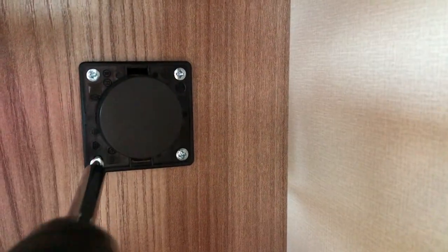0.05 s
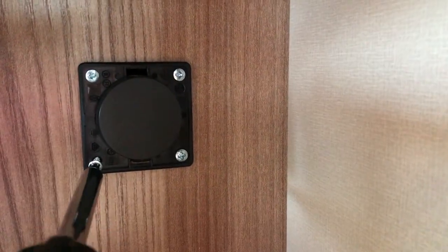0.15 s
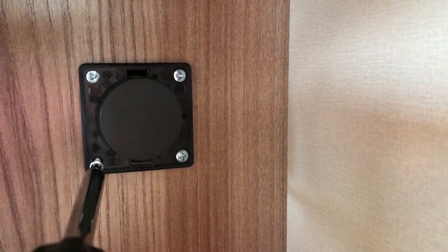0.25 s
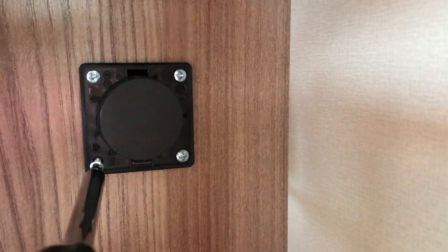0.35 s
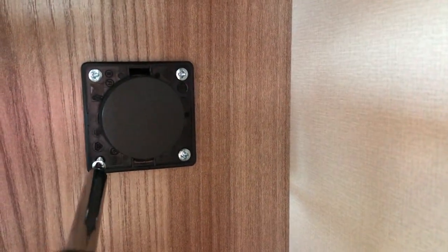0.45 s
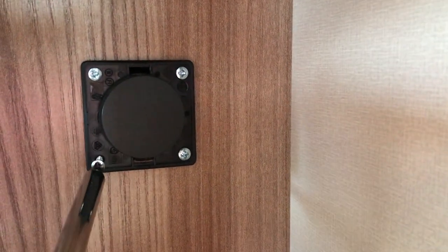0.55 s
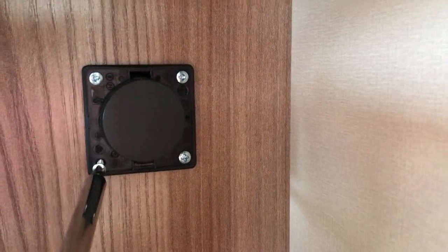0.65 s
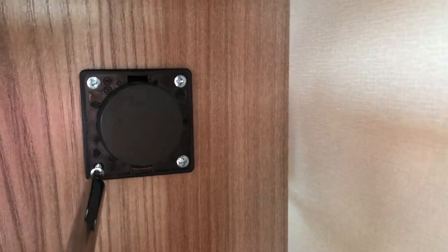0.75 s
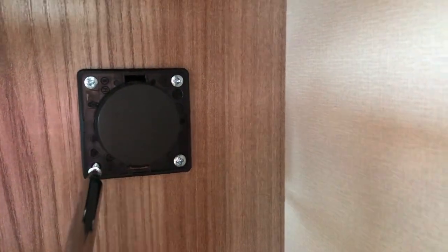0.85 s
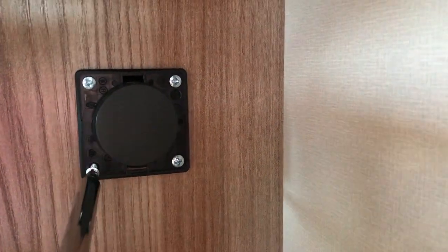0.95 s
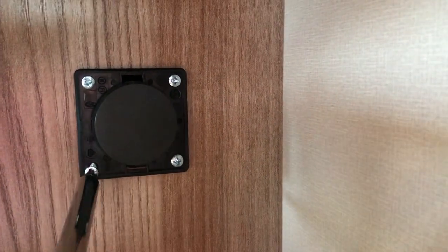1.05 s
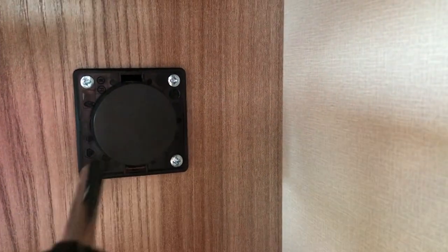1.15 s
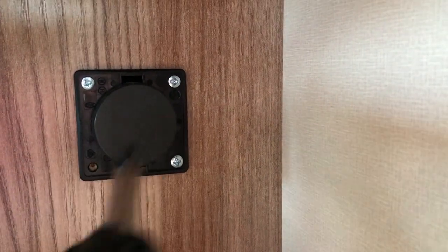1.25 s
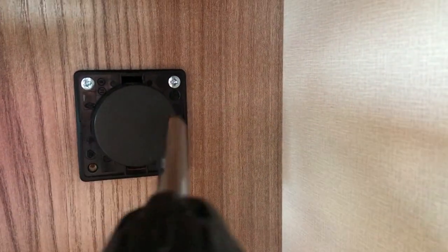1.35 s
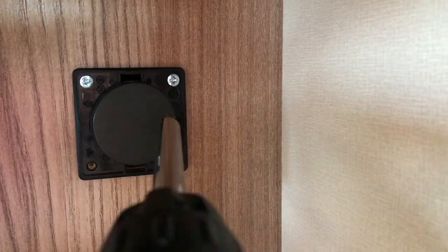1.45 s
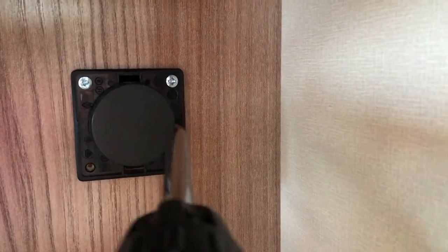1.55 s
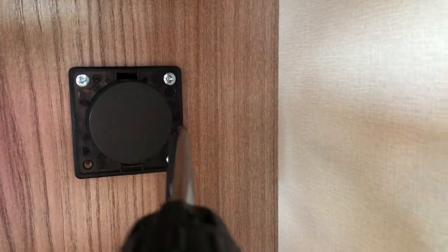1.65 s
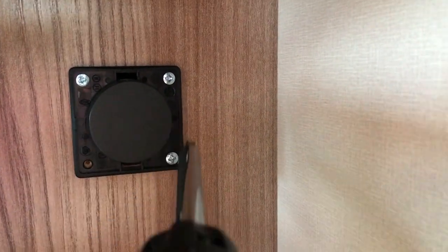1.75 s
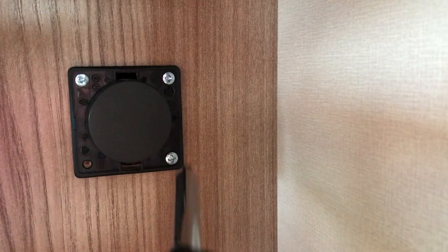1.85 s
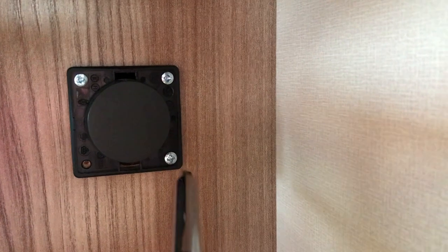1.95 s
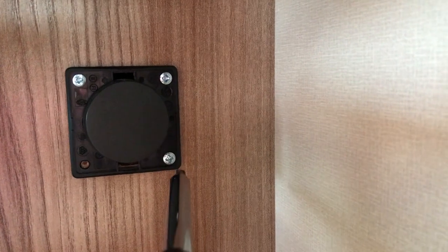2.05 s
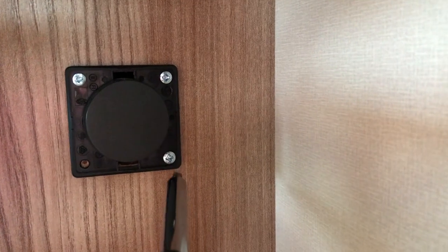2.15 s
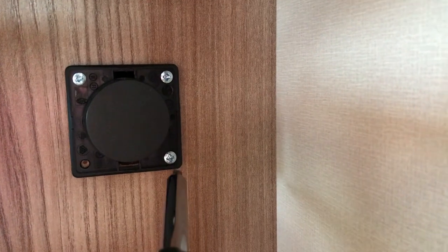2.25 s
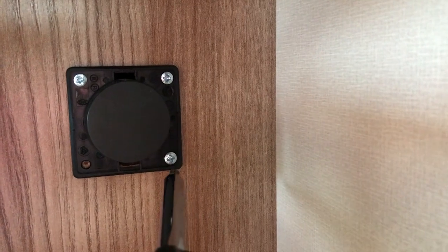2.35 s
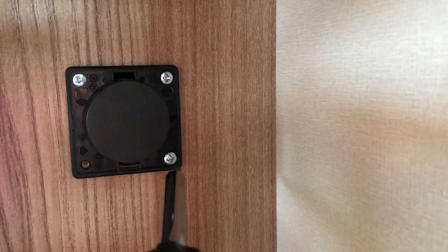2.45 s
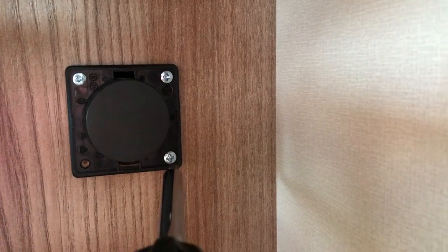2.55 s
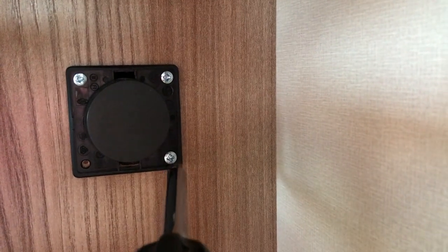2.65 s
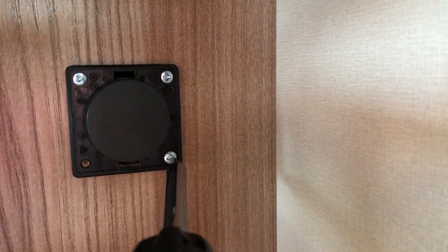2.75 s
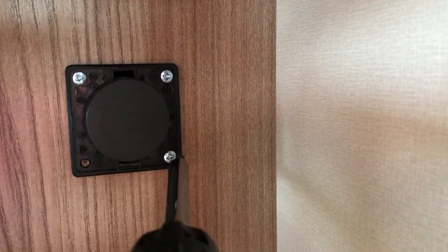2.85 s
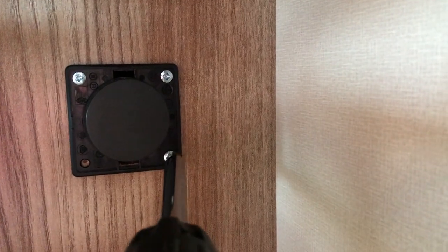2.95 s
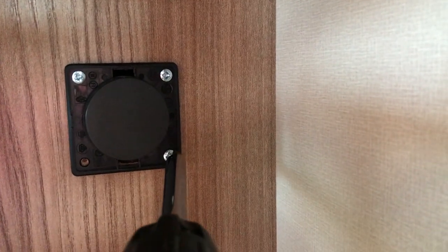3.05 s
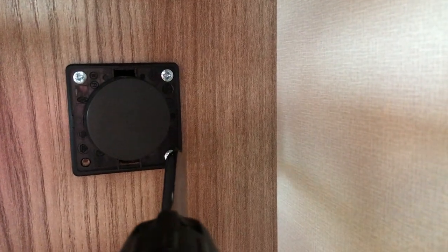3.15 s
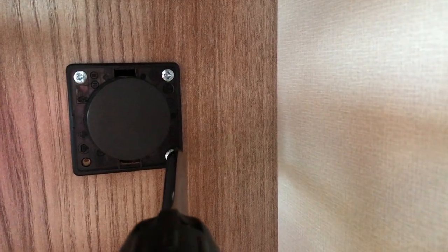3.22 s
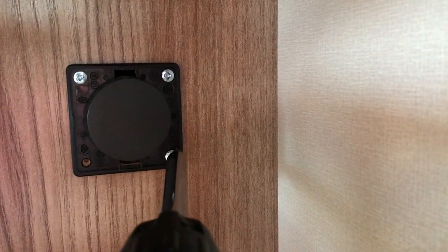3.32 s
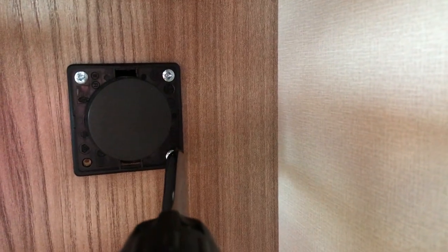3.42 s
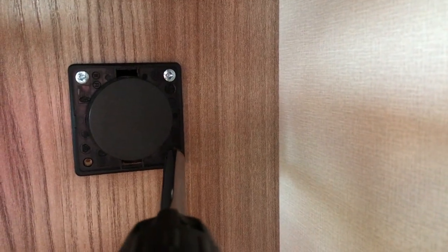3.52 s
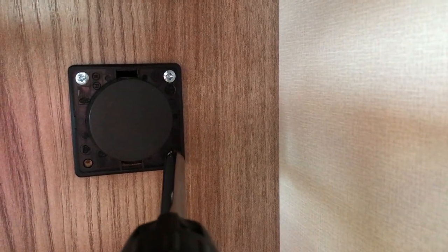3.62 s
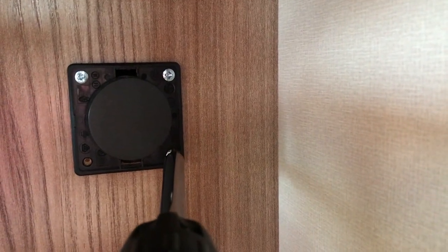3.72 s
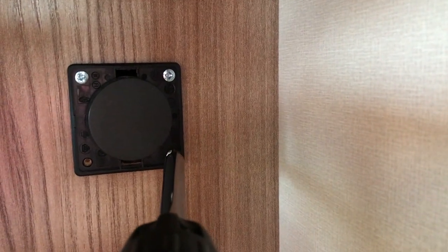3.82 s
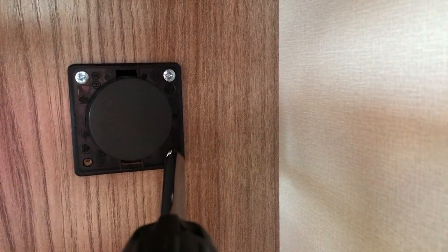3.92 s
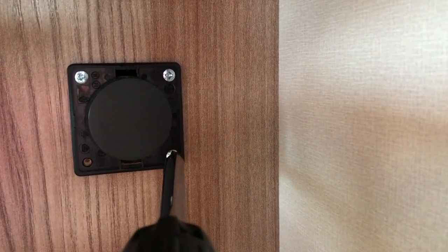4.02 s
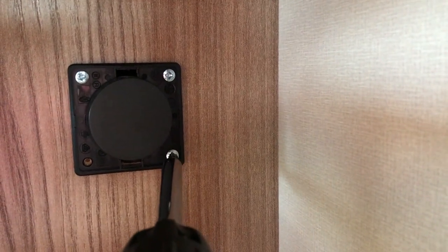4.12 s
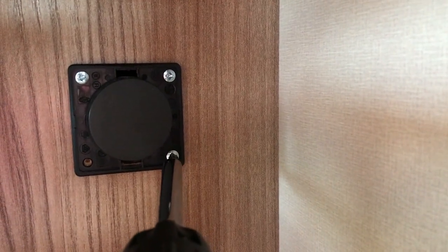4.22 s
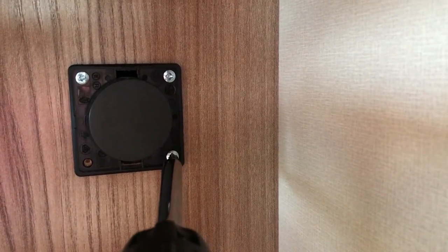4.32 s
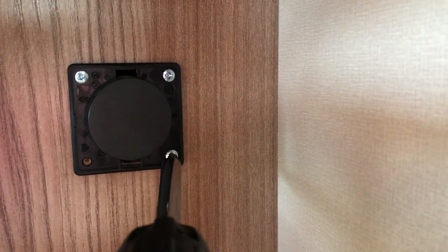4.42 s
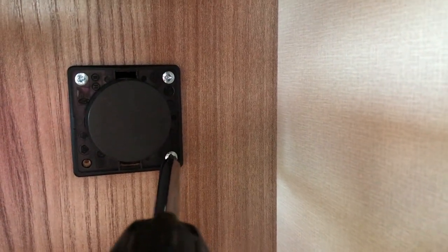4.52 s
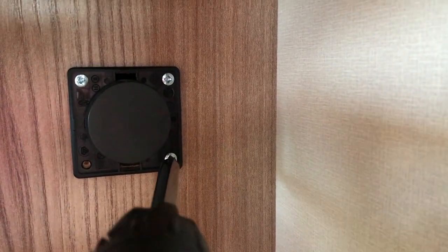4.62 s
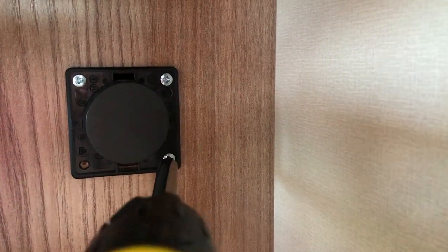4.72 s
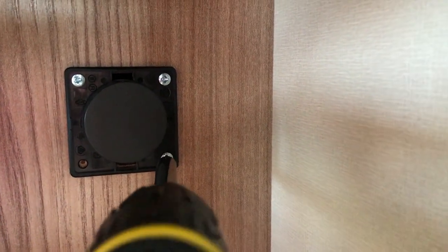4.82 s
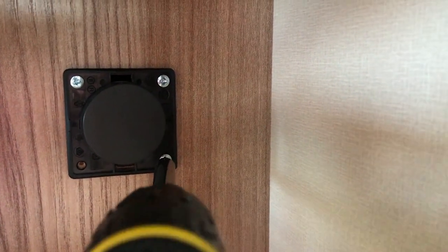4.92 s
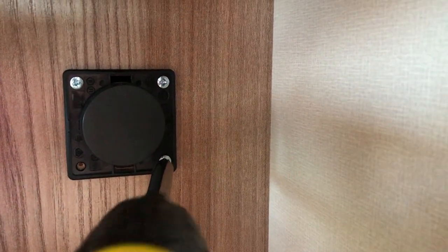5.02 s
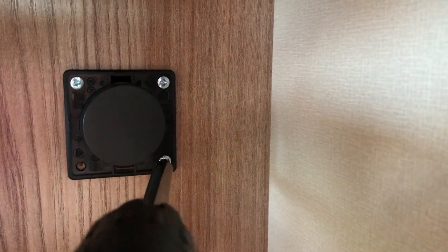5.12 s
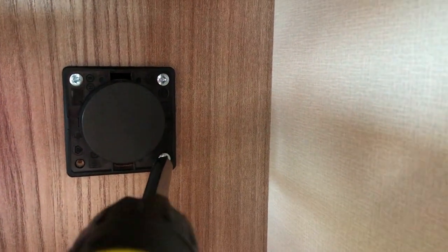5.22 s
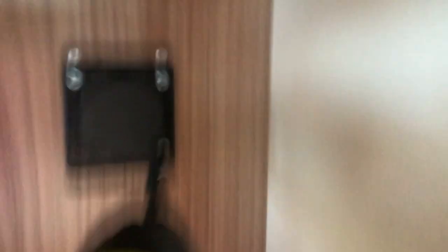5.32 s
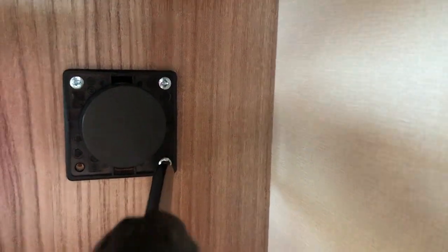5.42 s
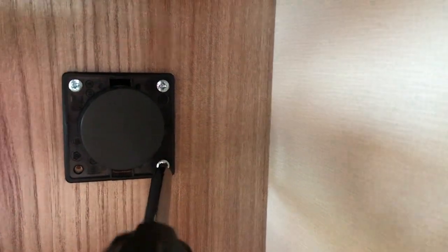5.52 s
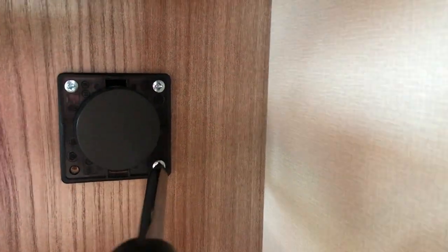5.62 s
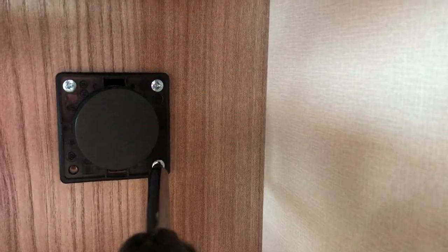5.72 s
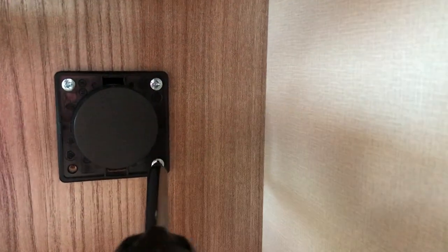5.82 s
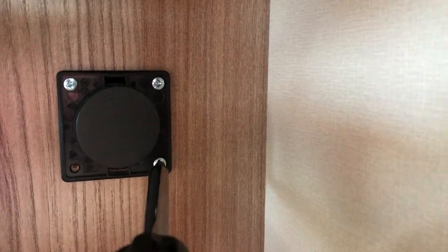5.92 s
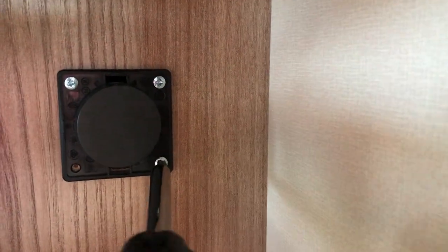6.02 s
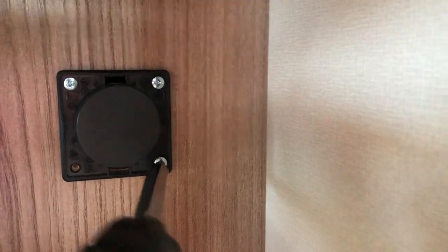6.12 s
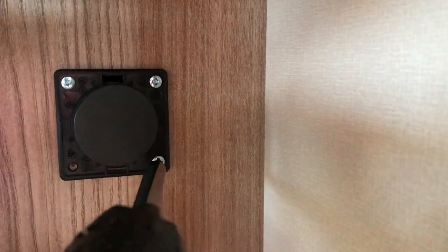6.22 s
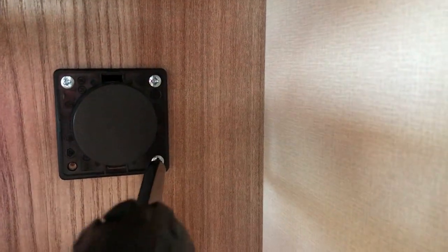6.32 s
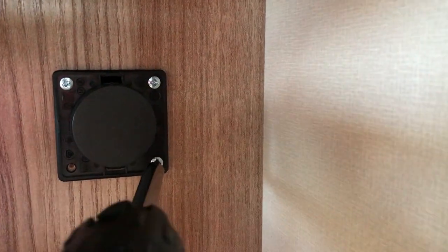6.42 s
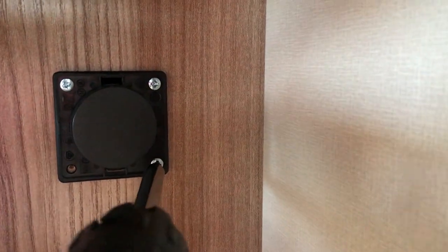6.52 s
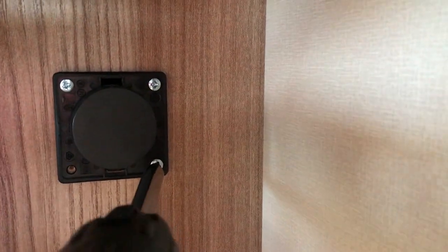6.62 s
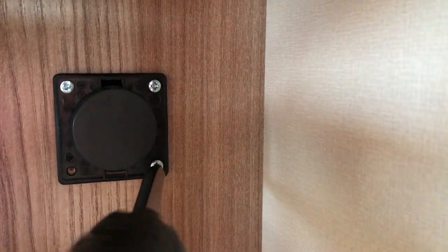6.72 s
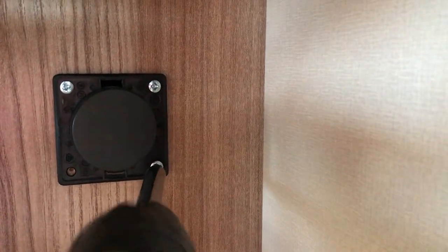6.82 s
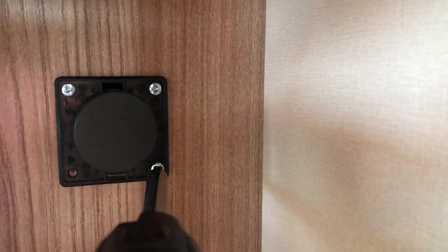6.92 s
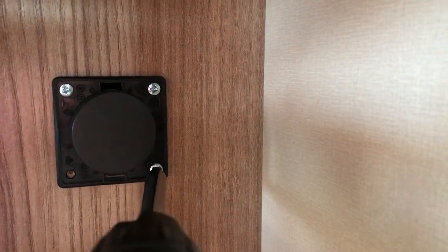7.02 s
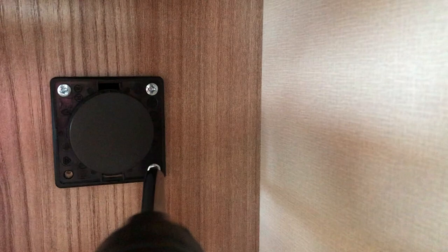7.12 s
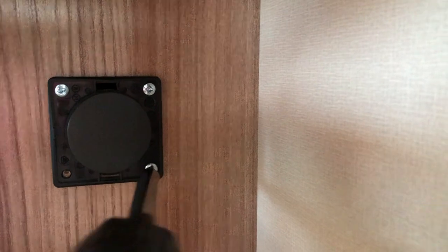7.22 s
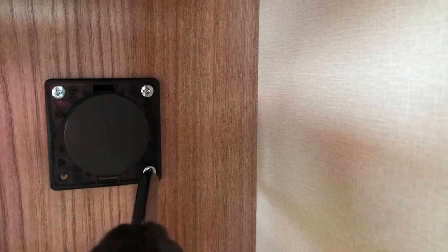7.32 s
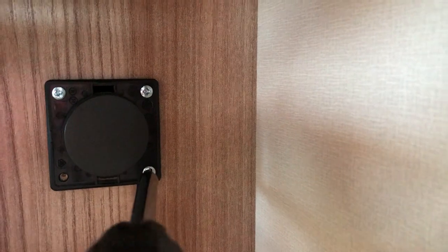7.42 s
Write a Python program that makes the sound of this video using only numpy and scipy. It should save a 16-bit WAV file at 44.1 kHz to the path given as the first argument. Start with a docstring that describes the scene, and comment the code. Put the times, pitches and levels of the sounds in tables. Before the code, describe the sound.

Small, dry sounds of unscrewing indoors, heard close up: gentle low panel knocks, plastic clicks and crackly finger rubs, then a loud tinkling screw drop dying in quick bounces. Near-quiet with low room tone follows. The driver returns with irregular woody taps, a quick thread creak, two bright snaps and soft rasps; the knocking grows strong and crowded at the end.

```python
"""A hand screwdriver works small screws out of a plastic fitting on a hollow wooden panel, close to a phone indoors.
The tip knocks and snaps in the screw head and a freed screw drops and bounces: blows that ring decaying modes.
Fingers rub on the grip as swells of crackly hiss; the thread rasps, creaks in quick slips and squeaks softly.
Under it lies a quiet room of shaped noise, narrow hums and a faint tick; just after a loud, bright hit
the phone lets more of the room through."""
import sys
import numpy as np
from scipy import signal
from scipy.fft import rfft, irfft
from scipy.io import wavfile
from scipy.ndimage import uniform_filter1d

SR = 44100
rng = np.random.default_rng(int(sys.argv[2]) if len(sys.argv) > 2 else 0)


def output_pcm(signal):
    """Save a mono or channel-first signal as 16-bit PCM at the path in sys.argv[1].

    Samples are clipped to [-1, 1] before scaling.
    """
    pcm = np.clip(np.atleast_2d(signal).T, -1, 1) * 32767
    wavfile.write(sys.argv[1], SR, np.round(pcm).astype(np.int16))


N = 328986
BLOW_SAMPLES = 8192  # room for one blow and its ringing

# The hollow wooden panel's low modes. Each row: frequency in Hz, strength in dB, decay by 60 dB in seconds.
PANEL_MODES = [(120, 2.5, 0.076), (139, 0, 0.096), (186.9, 4, 0.1005), (243.5, 3, 0.029), (374, -3, 0.052),
               (430, -3.5, 0.038), (518.5, -16.5, 0.073), (675.6, -13, 0.051), (850, -14.5, 0.065)]


def undb(db):
    """Turns dB into an amplitude factor."""
    return 10 ** (np.asarray(db) / 20)


def band(x, lo_hz, hi_hz):
    """Passes one range of frequencies."""
    return signal.sosfilt(signal.butter(2, [lo_hz, hi_hz], "bandpass", fs=SR, output="sos"), x)


def level(x, db):
    """Sets the RMS level in dB."""
    return x * undb(db) / np.sqrt(np.mean(x ** 2))


def walk(rate_hz):
    """Random values drawn at a steady rate and joined by straight slopes."""
    k = int(SR / rate_hz)
    steps = np.repeat(rng.standard_normal(N // k + 1), k)
    return uniform_filter1d(steps, k)[:N]


def swell(middle_s, length_s):
    """Samples around a moment and a soft rise and fall over them."""
    first = int((middle_s - 2 * length_s) * SR)
    last = min(int((middle_s + 2 * length_s) * SR), N)
    i = np.arange(first, last).clip(0)
    distance = np.abs(i / SR - middle_s) / (.6 * length_s)
    return i, np.exp(-distance ** 2.5)


def ring(modes, scatter_db=0., detune=.015):
    """Impulse answer of each mode: a decaying sine, its size and pitch scattered as if struck elsewhere each time."""
    hz, db, t60_s = np.transpose(modes)[:, :, None]
    t = np.arange(5120) / SR
    chance = rng.standard_normal((2, len(modes), 1))
    size = undb(db + scatter_db * chance[0])
    tone = np.sin(2 * np.pi * hz * (1 + detune * chance[1]) * t)
    return size * tone * np.exp(-np.log(1000) * t / t60_s)


def blows(table, modes, ranges_hz, touch, grit_db, dense_db, dense_t60_s, detune):
    """Each blow, one sharp touch and a gritty chatter dying over the contact time, rings the modes range by range.

    Table rows: start in seconds, a level in dB for each range, contact time in seconds.
    touch weighs the first touch against the chatter; dense_db sets the dense modes against the clear ones."""
    out = np.zeros(N + BLOW_SAMPLES)
    t = np.arange(3072) / SR
    mode_hz = np.transpose(modes)[0]
    click = np.arange(BLOW_SAMPLES) == 0
    shapes = [rfft(band(band(click, lo, hi), lo, hi)) for lo, hi in ranges_hz]
    for start_s, *levels_db, contact_s in table:
        noise = rng.standard_normal((3, len(t)))
        fade = np.exp(-t / contact_s)
        chatter = noise[0] * undb(grit_db * noise[1]) * fade
        chatter = rfft(chatter / np.linalg.norm(chatter), BLOW_SAMPLES)
        # modes too close to tell apart answer as noise: half its power follows the contact, half its own decay
        dense_fade = np.sqrt(.5 * fade ** 2 + .5 * undb(-120 * t / dense_t60_s))
        dense = rfft(noise[2] * dense_fade, BLOW_SAMPLES)
        rings = ring(modes, scatter_db=2.5, detune=detune)
        i = int(start_s * SR)
        for (lo, hi), shape, db, share_db, first in zip(ranges_hz, shapes, levels_db, dense_db, touch):
            struck = rings[(mode_hz >= lo) & (mode_hz < hi)].sum(0)
            clear = (first + chatter) * rfft(struck, BLOW_SAMPLES) * shape
            blur = dense * shape
            part = irfft(clear / np.linalg.norm(clear) + undb(share_db) * blur / np.linalg.norm(blur))
            # the level holds for the loudest 256 samples
            loudest = np.sqrt(uniform_filter1d(part ** 2, 256).max())
            out[i:i + BLOW_SAMPLES] += undb(db) * part / loudest
    return out[:N]


def metal_blows(table, modes, **settings):
    """Blows on small metal parts, heard as middle, upper, top and body ranges."""
    ranges_hz = [(2600, 7200), (7200, 10500), (10500, 16000), (340, 2600)]
    return blows(table, modes, ranges_hz, **settings)


def room():
    """Steady room tone with narrow hums of far machinery and a faint, clock-even tick at the very top."""
    # The room tone's spectrum before its overall level is set. Each row: frequency in Hz, density in dB per Hz.
    tone_shape = [(13, -46.5), (22, -21), (41, -1), (76, -2.5), (114, -11), (178, -14), (261, -23),
                  (440, -20), (478, -26.5), (876, -32), (1150, -33), (1400, -35), (2420, -36.5),
                  (7680, -46), (15700, -44.5)]
    # Narrow bands of far machinery. Each row: middle frequency in Hz, width in Hz, level in dB.
    hum_bands = [(413, 30, -83.5), (2300, 24, -99), (3660, 200, -88.5)]
    tick_first_s, tick_every_s = .0745, .1024
    hz, db = np.transpose(tone_shape)
    f = np.fft.rfftfreq(N, 1 / SR) + 1
    spectrum = undb(np.interp(np.log(f), np.log(hz), db, right=-140))
    tone = level(irfft(rfft(rng.standard_normal(N)) * spectrum, N), -61.5)
    hums = sum(level(band(rng.standard_normal(N), hz - width / 2, hz + width / 2), db)
               for hz, width, db in hum_bands)
    since_s = (np.arange(N) / SR - tick_first_s) % tick_every_s
    tick_noise = level(band(rng.standard_normal(N), 12300, 15370), -69.5)
    return tone + hums + tick_noise * np.exp(-since_s / .001)


def knocks():
    """The tip chatters on screw and fitting: the wooden panel rings low, the plastic fitting clicks above it."""
    # Each row: start in seconds, panel level in dB, depth (its bass against that level) in dB,
    # click of the fitting against the panel level in dB, contact time in seconds.
    knock_rows = [(0.102, -45.5, 5.5, -29, 0.016), (0.128, -58.5, -9, 1, 0.0042),
                  (0.18, -45, -9, 2.5, 0.0041), (0.226, -62.5, 12, -1.5, 0.012),
                  (0.342, -53.5, 3, -6.5, 0.0042), (0.553, -60.5, 9, -2.5, 0.0029),
                  (0.594, -54, 3.5, -6, 0.0083), (0.814, -62, 13, -1, 0.0069),
                  (0.917, -46.5, -12, -4, 0.021), (0.955, -50.5, 4, -1, 0.0061),
                  (1.119, -54, 5.5, -6, 0.0094), (1.171, -59, -2, 4, 0.0063),
                  (3.213, -40.5, -5.5, -0.5, 0.0056), (3.223, -40, 0.5, 1, 0.0084),
                  (3.265, -54.5, 10, 3, 0.0037), (3.546, -65.5, 0, 13, 0.0043),
                  (3.579, -52.5, -5, -22, 0.016), (3.627, -58.5, -6, -4.5, 0.0046),
                  (3.736, -37.5, -15.5, -15.5, 0.005), (3.948, -61, -15, -23.5, .004),
                  (4.036, -47, -13, -22, 0.0039), (4.047, -42.5, -5, -19, .004),
                  (4.133, -39, -7, -10, 0.0076), (4.184, -50, -3, -15, 0.0032),
                  (4.223, -39, -35, -1.5, 0.0072), (4.366, -35, -2, -18.5, 0.0029),
                  (4.442, -49.5, 0.5, -21, 0.0023), (4.61, -53, 8, -18, .004),
                  (4.622, -32.5, -0.5, -11.5, .0055), (4.652, -31.5, -3, -20.5, 0.004),
                  (4.7565, -39.5, -5.5, -22.5, .003), (4.8538, -42.5, -1, -22, 0.0019),
                  (4.964, -67.5, 9, 0.5, .002), (5.07, -46, -3.5, -10, 0.0064),
                  (5.095, -48, -7.5, -7, 0.0036), (5.112, -45, -17, 3.5, 0.0029),
                  (5.282, -60.5, -1, -11, .004), (5.369, -57, 6.5, -14.5, 0.0042),
                  (5.392, -61.5, 9, -4.5, 0.0035), (5.498, -63, 8, 1, 0.0057),
                  (5.519, -52.5, -6, -25.5, 0.0048), (5.573, -65, 6, -3, .003),
                  (5.64, -59.5, 8, -5, 0.0043), (5.687, -51.5, -5, -20, 0.0024),
                  (5.757, -50.5, -6, -24, .005), (5.788, -38, -5.5, -2.5, .01),
                  (6.038, -60.5, 3, -8, 0.005), (6.133, -55, 0.5, -17, .004), (6.219, -56, 6, -23.5, .004),
                  (6.336, -31.5, -0.5, -15.5, 0.0052), (6.365, -48, 6.5, -14.5, 0.02),
                  (6.395, -57.5, 6.5, 3.5, 0.01), (6.532, -43.5, 5.5, -23, 0.0055),
                  (6.777, -53, 3, 0, 0.0025), (6.8, -51.5, 5, -25, 0.0037),
                  (6.87, -49.5, 5.5, -21.5, 0.0053), (6.885, -44.5, -2, -19, .004),
                  (6.974, -35, -7, -18, 0.011), (6.982, -25, -1.5, -24, 0.0031),
                  (7.008, -52.5, 14.5, 0, 0.0042), (7.052, -59.5, 9, -17, .004),
                  (7.187, -48.5, -4, -7.5, 0.005), (7.196, -39, -7.5, -6.5, 0.0054),
                  (7.235, -53, -9, -22, .0035), (7.253, -54, 6, -15.5, 0.0037),
                  (7.277, -47, 2, -12, 0.0044), (7.304, -44.5, -23, -13, .0066),
                  (7.313, -40, -9, -19, 0.0024), (7.329, -40, -7, -3, 0.014),
                  (7.339, -37.5, -3, -2, 0.0046), (7.37, -39.5, -9, -8, 0.0081)]
    # The plastic fitting. Each row: frequency in Hz, strength in dB, decay by 60 dB in seconds.
    fitting_modes = [(1150, 0, .02), (1500, 0, .02), (1950, 0, .02), (2500, 0, .02), (3000, 0, .018),
                     (3500, 0, .018), (4100, 0, .018), (4650, 0, .018), (5500, 0, .015), (6600, 0, .015),
                     (8300, -3, .012), (9400, -3, .012), (11900, -4, .012), (14000, -4, .012)]
    # above 4.4 kHz against the click: a glancing knock is shallow and sharp
    edge_db, edge_per_depth = -16.5, -0.4
    ranges_hz = [(280, 1000), (70, 280), (1000, 4400), (4400, 12500)]
    table = []
    for start_s, db, depth, click, contact_s in knock_rows:
        edge = click + edge_db + edge_per_depth * depth
        table.append((start_s, db, db + depth, db + click, db + edge, contact_s))
    # the first touch weighs a little more on the panel than on the fitting
    return blows(table, PANEL_MODES + fitting_modes, ranges_hz, touch=[1.58, 1.41, 1.3, 1.29], grit_db=3.0,
                 dense_db=[-7.5, -26.5, 2, 7.5], dense_t60_s=.004, detune=.015)


def fingers():
    """Each stroke of skin over the grip swells and fades as a fine, crackly hiss."""
    # Each row: middle in seconds, length in seconds, hiss above 8 kHz in dB, hiss at 4-8 kHz in dB.
    strokes = [(0.125, 0.072, -65, -76), (0.188, 0.052, -67, -87), (.27, 0.088, -76, -73.5),
               (.327, 0.046, -64.5, -71.5), (0.532, 0.042, -68, -80), (0.584, 0.073, -67.5, -75),
               (0.698, 0.1, -72.5, -73), (0.843, 0.051, -65.5, -67), (0.926, 0.058, -52, -57.5),
               (1.045, 0.073, -73, -84), (1.146, 0.047, -61, -79), (1.209, 0.043, -62.5, -59),
               (1.272, 0.057, -63, -70), (5.444, 0.056, -70, -78), (5.514, 0.043, -70, -73.5),
               (5.661, 0.066, -73, -76.5), (5.702, 0.077, -71, -74.5), (5.804, 0.046, -60.5, -65.5),
               (5.884, 0.026, -75, -75.5), (5.964, 0.046, -64.5, -70), (6.049, 0.028, -66, -77),
               (6.151, 0.058, -53.5, -67.5), (6.22, 0.053, -73, -81.5), (6.395, .055, -67.5, -74),
               (6.53, 0.028, -63, -78), (6.677, 0.091, -79.5, -84), (6.834, 0.033, -63, -74.5),
               (6.879, 0.051, -64, -77), (6.983, 0.023, -66.5, -65), (7.248, 0.06, -63.5, -80),
               (7.279, .03, -74, -70), (7.336, 0.01, -49.5, -80)]
    # The skin's hiss bands. Each row: middle frequency in Hz, width in Hz, gain in dB.
    skin_bands = [(5688, 1600, 2), (6500, 620, 2), (9050, 1400, -3.5), (13200, 3600, -1.5)]
    grit_db = 2.5
    out = np.zeros(N)
    hiss = [undb(db) * band(rng.standard_normal(N), hz - width / 2, hz + width / 2)
            for hz, width, db in skin_bands]
    fine = level((hiss[2] + hiss[3]) * undb(grit_db * (walk(400) + walk(60))), 0)
    coarse = level((hiss[0] + hiss[1]) * undb(grit_db * (walk(400) + walk(60))), 0)
    for middle_s, length_s, fine_db, coarse_db in strokes:
        i, shape = swell(middle_s, length_s)
        out[i] += (undb(fine_db) * fine[i] + undb(coarse_db) * coarse[i]) * shape
    return out


def snaps():
    """The tip jumps in the screw head: bright, short metal rings."""
    # Each row: start in seconds, level in dB, shine (the top against that level) in dB.
    snap_rows = [(0.13, -61, -3), (.18, -46.5, -17), (0.592, -54, -18), (.838, -48.5, -6.5),
                 (1.139, -60, 0), (1.198, -50.5, -13), (1.225, -56.5, -9), (1.252, -58, -6.5),
                 (4.7538, -25, 1), (4.853, -25, 2.5), (5.391, -67, -0.5)]
    # The screwdriver tip. Each row: frequency in Hz, strength in dB, decay by 60 dB in seconds.
    tip_modes = [(640, -8, .026), (880, -8, .026), (2260, -9, .016), (3300, -9, .016), (4600, -10, .014),
                 (5600, -8, .021), (6800, 6, .026), (8200, -7, .014), (9350, -6, .014), (10100, -7, .014),
                 (11900, -5, .014), (13060, -2, .017), (13700, -3, .014), (14700, -3, .014),
                 (15200, -2, .014)]
    # 7.2-10.5 kHz against the top; under 2.6 kHz against the level
    upper_db, body_db, contact_s = -4.5, -12.5, .0025
    table = [(start_s, db, db + shine + upper_db, db + shine, db + body_db, contact_s)
             for start_s, db, shine in snap_rows]
    return metal_blows(table, tip_modes, touch=[.9] * 4, grit_db=3.0, dense_db=[0, 4, 4, 3],
                       dense_t60_s=.02, detune=.006)


def push():
    """The thread rasps in grains while the hand's pressure shakes the panel in small uneven jolts."""
    # Each push: middle in seconds, length in seconds, panel shake in dB, thread rasp in dB.
    pushes = [(0.134, 0.068, -47, -67), (0.178, 0.024, -38, -67), (0.263, .12, -59, -77),
              (.66, 0.63, -60.5, -78.5), (0.845, 0.02, -50, -62), (0.948, 0.06, -43, -64.5),
              (1.157, .045, -53.5, -78), (1.216, 0.094, -81, -63.5), (3.279, 0.039, -45, -72.5),
              (3.57, 0.039, -61, -57.5), (4.117, 0.032, -53, -77), (4.708, 0.059, -46.5, -76),
              (5.378, 0.067, -46.5, -64), (5.504, 0.12, -54, -73), (5.675, 0.079, -55, -70),
              (5.76, 0.073, -46, -76), (5.838, 0.055, -51, -77), (5.963, 0.044, -49.5, -69),
              (6.149, 0.12, -57.5, -70), (6.226, 0.032, -52, -84), (6.838, 0.092, -55, -72),
              (6.905, 0.064, -46, -79), (7.273, 0.15, -46, -70), (7.308, 0.023, -36, -52),
              (7.4, 0.067, -48.5, -74)]
    rasp_grit_db, shake_lumps_db, shake_grain_db = 4, 2.5, 4.5
    out = np.zeros(N)
    grains = rng.standard_normal(N) * undb(rasp_grit_db * walk(300))
    rasp = level(band(grains, 790, 3400), 0)
    unevenness_db = shake_lumps_db * walk(68) + shake_grain_db * rng.exponential(size=N)
    jolts = rng.standard_normal(N) * undb(unevenness_db)
    shake = level(signal.fftconvolve(jolts, ring(PANEL_MODES).sum(0))[:N], 0)
    for middle_s, length_s, shake_db, rasp_db in pushes:
        i, shape = swell(middle_s, length_s)
        out[i] += (undb(shake_db) * shake[i] + undb(rasp_db) * rasp[i]) * shape
    return out


def dropped_screw():
    """The freed screw bounces: each landing is a short blow on its own small metal modes."""
    # Each row: start in seconds, level in dB, shine (above 7 kHz against that level) in dB.
    bounce_rows = [(1.327, -54, -2), (1.3392, -50, -20), (1.3505, -16.5, -9), (1.357, -20, -15),
                   (1.3806, -20.5, 3), (1.4181, -24.5, -8), (1.4416, -32.5, -32), (1.4591, -33.5, -21),
                   (1.4741, -38.5, -33), (1.526, -36.5, 2.5), (1.5513, -26.5, -2.5), (1.5673, -35, -25),
                   (1.5859, -31, -1.5), (1.6036, -34.5, -15), (1.6151, -43.5, -20), (1.6778, -61, -16),
                   (1.7015, -49.5, -11), (1.8787, -62.5, 2)]
    # The loose screw. Each row: frequency in Hz, strength in dB, decay by 60 dB in seconds.
    screw_modes = [(530, -12, .02), (1430, -12, .03), (1740, -12, .035), (1900, -12, .035), (2900, -7, .03),
                   (3150, -2, .04), (3450, -1, .035), (3820, -6, .035), (4170, -4, .04), (4420, -6, .035),
                   (5140, -8, .03), (5700, -3, .035), (6100, -3, .03), (6530, -4, .025), (6840, -6, .025),
                   (7900, -2, .03), (8640, -8, .025), (9100, -5, .03), (11150, -4, .045), (12800, -6, .025),
                   (13070, -4, .025), (14000, -5, .02), (14750, -6, .025)]
    # the part under 2.6 kHz grows slower than the ring: dB per dB
    body_db, body_slope = -20, 0.69
    top_db, contact_s = 0.5, .0015  # above 10.5 kHz against the shine
    table = [(start_s, db, db + shine, db + shine + top_db, body_db + body_slope * db, contact_s)
             for start_s, db, shine in bounce_rows]
    return metal_blows(table, screw_modes, touch=[.7] * 4, grit_db=4.0, dense_db=[-1, 0, 0, 1],
                       dense_t60_s=.045, detune=.004)


def room_let_through(background, hits):
    """The phone lifts the middle and treble of the background for a moment after a loud, bright hit."""
    open_at_db, hold_s = -24, .407
    middle_db, top_db = 8, 10.5
    loud = np.abs(band(hits, 2000, 16000)) > undb(open_at_db)
    hold = int(hold_s * SR)
    # the shifted window looks back only: open while a loud sample lies within the hold time
    gate = uniform_filter1d(loud * 1., hold | 1, origin=hold // 2) > 1e-9
    middle = (undb(middle_db) - 1) * band(background, 600, 5000)
    top = (undb(top_db) - 1) * band(background, 2900, 16500)
    return background + uniform_filter1d(gate * 1., 200) * (middle + top)


def creak():
    """Nearly even slips: each is a small blow on the panel and a puff of grit from the thread."""
    start_s, slips_hz, start_db, sag_db_per_s = 3.544, 185.8, -42, 184
    attack_s, hold_s, release_s = .012, .0603, .034
    t = np.arange(N) / SR - start_s
    turns = t * slips_hz + 0.05 * walk(44)
    slips = (np.diff(np.floor(turns), prepend=0) > 0) * undb(2.0 * rng.standard_normal(N))
    knocked = signal.fftconvolve(slips, ring(PANEL_MODES).sum(0))[:N]
    grit = band(rng.standard_normal(N) * np.exp(-(turns % 1) / 0.81), 1100, 3200)
    body = level(band(knocked, 233, 750), 0) + level(grit, -15.0)
    rise = (t / attack_s).clip(0, 1)
    fall = (1 - (t - hold_s) / release_s).clip(0, 1)
    return body * rise * fall * undb(start_db - sag_db_per_s * t.clip(0, 1))


def squeaks():
    """Faint squeaks of the turning thread: short, soft sine tones."""
    # Each row: middle in seconds, length in seconds, frequency in Hz, peak level in dB.
    squeak_rows = [(4.58, .008, 780, -60), (5.119, .008, 850, -54), (5.197, .02, 1300, -66),
                   (5.36, .015, 1400, -64)]
    t = np.arange(N) / SR
    return sum(undb(db) * np.sin(2 * np.pi * hz * t) * np.exp(-((t - middle_s) / length_s) ** 2)
               for middle_s, length_s, hz, db in squeak_rows)


def room_tail(hits, drop):
    """Close walls and soft furnishings answer the hits with a short tail of decaying noise."""
    t60_s, tail_db = .1, -18.5
    drop_db = 3  # the screw lands farther away, so more of the room answers it
    t = np.arange(SR // 3) / SR
    tail = band(rng.standard_normal(len(t)), 900, 15000) * undb(-60 * t / t60_s)
    tail = tail / np.sqrt(np.sum(tail ** 2))
    sent = hits + (undb(drop_db) - 1) * drop
    return undb(tail_db) * signal.fftconvolve(sent, tail)[:N]


def scene():
    """Sums the hits and their tail, the handling and thread sounds, and the room."""
    drop = dropped_screw()
    hits = drop + snaps() + knocks()
    handling = fingers() + push()
    thread = creak() + squeaks()
    background = room_let_through(room(), hits)
    return (hits + room_tail(hits, drop) + handling + thread + background)[None]


def record(dry):
    """The small microphone drops the deep bass; the phone cuts the top."""
    bottom_hz, top_hz = 65, 15900
    thin = signal.sosfilt(signal.butter(3, bottom_hz, "highpass", fs=SR, output="sos"), dry)
    return signal.sosfilt(signal.ellip(8, .2, 70, top_hz, fs=SR, output="sos"), thin)


dry = scene()
out = record(dry)
output_pcm(out)
```